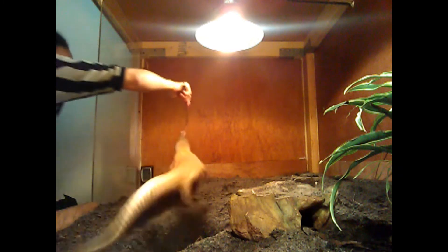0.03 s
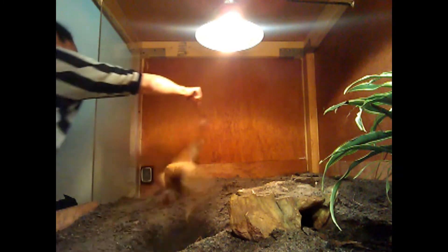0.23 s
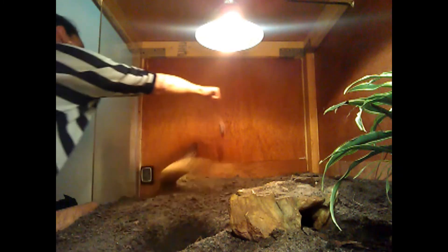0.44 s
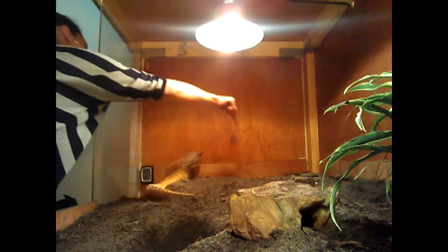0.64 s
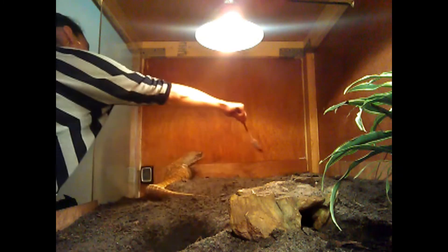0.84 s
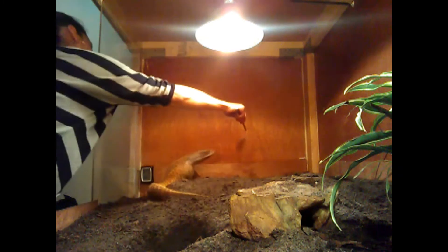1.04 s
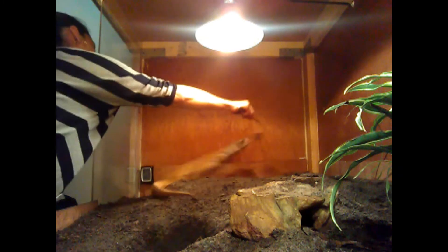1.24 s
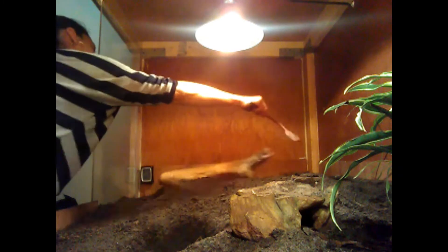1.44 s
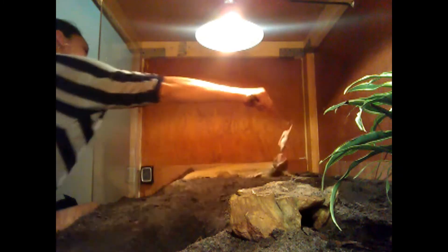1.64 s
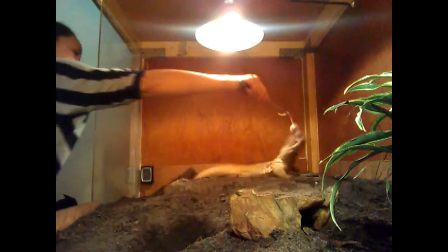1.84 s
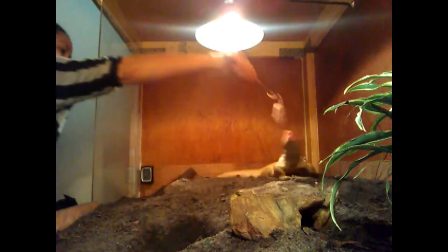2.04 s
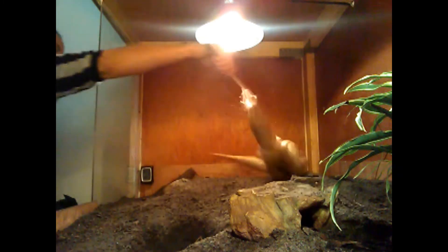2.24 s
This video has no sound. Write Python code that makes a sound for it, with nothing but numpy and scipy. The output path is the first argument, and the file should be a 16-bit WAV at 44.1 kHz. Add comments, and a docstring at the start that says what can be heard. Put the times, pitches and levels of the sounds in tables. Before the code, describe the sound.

Gritty scuffling of a lizard lunging through dirt in a wooden box, with a thump.

```python
"""Lizard lunging in a wooden box

A large lizard lunges for food over loose soil in a wooden enclosure, then shuffles and thumps down again.
Claws spray grit, the belly drags with a duller scrape, and the body knocks on the boards.
The box rings with every move; behind it lies a quiet room."""
import sys
import numpy as np
from scipy import signal
from scipy.fft import rfft, irfft, next_fast_len
from scipy.io import wavfile
from scipy.ndimage import uniform_filter1d

SR = 44100
rng = np.random.default_rng(int(sys.argv[2]) if len(sys.argv) > 2 else 0)


def file_out(sig):
    """Save sig as 16-bit WAV at sys.argv[1]."""
    # one column per channel
    cols = np.atleast_2d(sig).T
    # limit, then scale
    lim = np.clip(cols, -1, 1)
    pcm = np.round(lim * 32767).astype(np.int16)
    wavfile.write(sys.argv[1], SR, pcm)


N = 101429
T = np.arange(N) / SR

# crunch of coarse grit (frequency [Hz], relative level [dB])
COARSE_EQ = [(100, -72.5), (250, -24), (700, -13.5), (1500, -13), (2600, 0.5), (3300, -2), (4100, 4.5),
             (5000, -1.5), (6500, -2.5), (9000, -12.5)]
# sizzle of fine grit (frequency [Hz], relative level [dB])
FINE_EQ = [(100, -67), (500, -39.5), (2500, -25.5), (4500, -9.5), (6300, 8), (7500, 2.5), (8700, 11),
           (9500, -7.5)]
# dull scrape of the belly (frequency [Hz], relative level [dB])
DRAG_EQ = [(60, -68), (140, -37.5), (240, -15.5), (340, -28), (450, -12), (620, -8.5), (780, 3),
           (1200, -4.5), (1800, 2), (2400, -6.5), (4000, -8), (9000, -45)]


def amp(db):
    """Decibels to gain."""
    return 10 ** (np.asarray(db) / 20)


def unit(x):
    """Scales to an rms of one."""
    return x / np.sqrt(np.mean(x ** 2) + 1e-20)


def read(points, hz):
    """Reads a curve along a logarithmic frequency axis."""
    f, value = np.transpose(points)
    return np.interp(np.log(hz + 1), np.log(f), value)


def envelope(points):
    """Gain over time from a level curve, silent outside it."""
    s, db = np.transpose(points)
    return amp(np.interp(T, s, db, left=-np.inf, right=-np.inf))


def add(mix, s, sound):
    """Mixes a sound in at a time, dropping what falls outside."""
    start = round(s * SR)
    sound = sound[:, max(-start, 0):]
    part = mix[:, max(start, 0):][:, :sound.shape[1]]
    part += sound[:, :part.shape[1]]


def colour(x, points, modes=(), size=8192):
    """Minimum-phase EQ of unit energy, from a curve plus resonant peaks and dips."""
    hz = abs(np.fft.fftfreq(size, 1 / SR))
    modes_db = sum(boost / (1 + (2 * (hz - f) / width) ** 2) for f, width, boost in modes)
    log_gain = np.log(amp(read(points, hz) + modes_db))
    spectrum = np.exp(np.conj(signal.hilbert(log_gain)))
    response = np.fft.ifft(spectrum).real[None, :size // 2]
    return signal.fftconvolve(x, response / np.linalg.norm(response), axes=1)[:, :x.shape[1]]


def blend(pair):
    """Makes two unrelated sides alike in the bass and leaves them wide in the treble."""
    # likeness of left and right (frequency [Hz], coherence [0 to 1])
    likeness = [(100, 1), (280, .9), (500, 0.8), (800, 0.75), (1200, 0.4), (2300, 0.25), (9000, 0.27)]
    size = next_fast_len(pair.shape[1] + 2048)
    coherence = np.clip(read(likeness, np.fft.rfftfreq(size, 1 / SR)), 0, 1)
    angle = np.arcsin(coherence) / 2
    spectra = rfft(pair, size)
    return irfft(spectra * np.cos(angle) + spectra[::-1] * np.sin(angle), size)[:, :pair.shape[1]]


def grains(size, per_s=9000, spread_db=1.5, clump_db=1.6, clump_s=.004):
    """Dense, clumped clicks of colliding crumbs; each side gets its own, in shared clumps."""
    strength = amp(spread_db * np.minimum(rng.exponential(1, (2, size)), 4))
    clumps = amp(clump_db * unit(uniform_filter1d(rng.standard_normal(size), int(clump_s * SR))))
    polarity = rng.choice([-1, 1], (2, size))
    hits = rng.random((2, size)) < per_s / SR
    return unit(strength * clumps * polarity * hits)


def burst(decay_s, rise_s, size=8192):
    """A puff of noise with a linear attack and an exponential release."""
    age = np.arange(size) / SR
    attack = np.minimum(age / rise_s, 1)
    release = np.exp(-np.maximum(age - rise_s, 0) / decay_s)
    return rng.choice([-1, 1], (2, size)) * attack * release


def room_tone(level_db=-69):
    """Faint, steady air of the room."""
    # tone of the air (frequency [Hz], relative level [dB])
    air_eq = [(25, 10), (70, -4.5), (140, -22.5), (220, -1), (700, 4), (2000, 3), (4000, 1), (5200, -3.5),
              (7500, -10), (9000, -7)]
    return amp(level_db) * blend(colour(rng.standard_normal((2, N)), air_eq))


def creep():
    """A quiet bed of soil that keeps shifting under the animal."""
    # swell of the shifting soil (time [s], level [dB])
    swell = [(0, -57.5), (0.13, -53), (0.7, -57.5), (0.82, -67), (1.02, -80.5), (1.12, -56.5), (1.33, -66),
             (1.55, -48.5), (1.75, -49.5), (2.03, -52), (2.3, -58.5)]
    # its broad rustle (frequency [Hz], relative level [dB])
    rustle_eq = [(60, -27), (140, -19), (240, -11), (450, -4), (800, -1), (1250, -4), (1800, -1.5),
                 (3000, -2.5), (4100, -4.5), (5500, -6.5), (9000, -4)]
    gain = amp(np.interp(T, *np.transpose(swell)))
    return colour(grains(N) * gain, rustle_eq)


def claw_ticks(half_width_octaves=.45):
    """Brief, bright clicks of a claw catching on something hard."""
    # claw catches (time [s], level [dB], band centre [Hz], decay [s])
    catches = [(0.2135, -19.5, 8940, 0.00071), (0.776, -59.5, 5940, 0.0068), (1.9472, -37.5, 8100, 0.0032),
               (1.952, -33, 6500, 0.0022)]
    ticks = np.zeros((2, N))
    hz = np.geomspace(100, 12000, 60)
    for s, db, centre_hz, decay_s in catches:
        band_db = -10 * np.log10(1 + (np.log2(hz / centre_hz) / half_width_octaves) ** 4)
        click = amp(db) * burst(decay_s, rise_s=decay_s / 10)
        add(ticks, s, colour(click, np.column_stack([hz, band_db]), size=1024))
    return ticks


def thumps():
    """The body rattles the boards, and soft, heavy footfalls boom in the floor of the box."""
    # body against the boards (time [s], level [dB], decay [s])
    knocks = [(0.027, -39, 0.011), (0.037, -36, 0.013), (0.782, -53.5, 0.0014), (1.582, -28, 0.0074),
              (1.586, -26, .005), (1.59, -27, 0.0076)]
    # woody knock of the boards (frequency [Hz], relative level [dB])
    boards_eq = [(60, -76), (140, -43.5), (240, -16), (450, -8.5), (800, 5), (1250, -1.5), (1800, 8),
                 (2500, -7.5), (4000, -18), (9000, -30.5)]
    # feet landing (time [s], level [dB])
    footfalls = [(0.028, -54.5), (0.28, -51), (0.35, -51), (0.441, -45.5), (0.529, -56.5), (0.596, -50.5),
                 (1.19, -70), (1.46, -62.5), (1.582, -45.5)]
    # boom of the floor (frequency [Hz], relative level [dB])
    floor_eq = [(100, -37.5), (220, -9.5), (283, 0), (340, -15.5), (440, 2), (560, 0), (900, -14),
                (3000, -55)]
    blows, steps = np.zeros((2, 2, N))
    for s, db, decay_s in knocks:
        add(blows, s, amp(db) * burst(decay_s, rise_s=.0011))
    for s, db in footfalls:
        add(steps, s, amp(db) * burst(decay_s=.012, rise_s=.016))
    return colour(blows, boards_eq) + colour(steps, floor_eq)


def scuffs(rasp_q=3, rasp_db=8, size=8192):
    """Each foot stroke stirs coarse grit and a dull drag, tinted by its own rasp, plus fine grit."""
    # foot strokes in the soil (peak time [s], rise [s], fall [s], grit level [dB], drag level [dB],
    # fine over coarse grit [dB], rasp centre [Hz])
    strokes = [ (0.036, .007, 0.025, -51.5, -56, -4, 4020), (0.085, 0.0077, 0.013, -48.5, -50, -9.5, 2030),
               (0.143, 0.022, 0.0065, -66, -57, -2, 900), (0.176, 0.0096, 0.0078, -45.5, -46, -17, 3650),
               (0.213, .014, 0.019, -43, -45.5, 6, 860), (0.275, 0.023, 0.07, -44, -39.5, -12, 1600),
               (0.346, .009, .008, -23, -39.5, -2, 5200), (0.392, 0.0051, 0.0087, -39, -34.5, -6, 850),
               (0.412, .016, 0.014, -34, -31.5, -2, 1520), (0.426, 0.0048, 0.023, -23, -31.5, 10, 7000),
               (0.453, 0.0018, 0.0078, -19.5, -30.5, 0.5, 780),
               (0.466, 0.0026, 0.0084, -22, -33, -0.5, 3900),
               (0.508, 0.0046, 0.0059, -24.5, -34.5, -2, 776), (0.608, 0.0093, 0.006, -50, -41.5, 14, 834),
               (0.688, .006, .012, -67, -62.5, 2, 480), (0.963, .008, 0.022, -65.5, -77.5, -15, 3900),
               (1.097, 0.029, 0.031, -64.5, -66, -2.5, 3500), (1.162, 0.0085, .025, -45, -70, -1.5, 5040),
               (1.196, 0.012, .020, -47.5, -55, -2.5, 2500), (1.250, 0.013, 0.037, -53, -61, 1, 2550),
               (1.285, .016, 0.019, -53, -58.5, 0, 4260), (1.383, 0.023, 0.028, -52, -66, 0, 4340),
               (1.409, .010, 0.014, -53.5, -58.5, 0, 770), (1.476, .014, 0.021, -41.5, -55.5, -2.5, 3300),
               (1.516, 0.014, 0.008, -48.5, -55.5, 15, 810), (1.573, .013, 0.025, -43, -43, 4.5, 3700),
               (1.605, 0.021, 0.028, -36, -38.5, -9.5, 2490), (1.648, 0.012, 0.026, -43, -46.5, -3.5, 3730),
               (1.736, 0.015, 0.023, -43.5, -48, 1.5, 785), (1.781, 0.0084, 0.019, -42.5, -50, 4.5, 1780),
               (1.805, 0.0053, 0.0085, -38, -48, -1.5, 3700), (1.868, .014, 0.02, -56, -71, -2, 2600),
               (1.912, 0.011, 0.014, -51, -50, -24, 2720), (1.967, 0.012, 0.0073, -46, -51, -2, 3850),
               (2.004, 0.014, 0.026, -53.5, -53, 2.5, 4000), (2.051, 0.016, 0.018, -72, -54, 9, 1740),
               (2.096, 0.011, .012, -51.5, -55, 1, 2700), (2.120, 0.011, 0.015, -50.5, -55, -12, 4070),
               (2.210, 0.016, 0.013, -59, -55.5, 1, 1620), (2.290, 0.022, .018, -63.5, -63, -19, 1900)]
    coarse, fine, drag = np.zeros((3, 2, N))
    t = (np.arange(size) - size // 2) / SR
    for peak, rise, fall, grit_db, drag_db, fine_db, rasp_hz in strokes:
        start = peak + t[0]
        stroke = np.exp(-(t / np.where(t < 0, rise, fall)) ** 2 / 2)  # lopsided bell
        grit = stroke * amp(grit_db) / np.hypot(1, amp(fine_db))  # coarse and fine share the power
        rasp = [(rasp_hz, rasp_hz / rasp_q, rasp_db)]
        add(coarse, start, colour(grains(size) * grit, COARSE_EQ, rasp, size=1024))
        add(drag, start, colour(grains(size) * stroke * amp(drag_db), DRAG_EQ, rasp, size=2048))
        add(fine, start, grains(size) * grit * amp(fine_db))
    return coarse + drag + colour(fine, FINE_EQ)


def lunge():
    """The long scramble: coarse and fine grit spray while the body drags."""
    # swell of spraying soil (time [s], level [dB])
    spray_swell = [(0.14, -65), (0.175, -47.5), (0.27, -38), (0.315, -32.5), (0.385, -30), (0.45, -29.5),
                   (0.50, -29.5), (0.555, -29.5), (0.605, -42), (0.64, -51.5), (0.76, -79)]
    # swell of the body dragging over the ground (time [s], level [dB])
    drag_swell = [(0.11, -79), (0.18, -54.5), (0.26, -40), (0.36, -35), (0.40, -32), (0.455, -35.5),
                  (0.49, -35), (0.55, -34.5), (0.61, -46), (0.635, -64.5), (0.76, -90)]
    spray = envelope(spray_swell) * np.sqrt(.5)  # half the power to each size of grit
    coarse = colour(grains(N) * spray, COARSE_EQ)
    fine = colour(grains(N) * spray, FINE_EQ)
    drag = colour(grains(N) * envelope(drag_swell), DRAG_EQ)
    return coarse + fine + drag


def enclosure(x, wet_db, size=256):
    """The wooden box adds its standing waves and a short, dense reverb."""
    # standing waves of the box (frequency [Hz], width [Hz], boost [dB])
    box_modes = [(283.3, 35, 9), (415, 100, 5.5), (500, 22, 2.5), (763.7, 40, 6.5), (846.4, 17, 5.5),
                 (941, 28, 4), (1096, 30, 5.5), (1294, 26, 2.5), (1610, 22, -6.5), (1602, 33, 5),
                 (1770, 10, -5.5), (1918, 35, 5.5)]
    # reverb of the box (frequency [Hz], time to fall 60 dB [s])
    box_decay = [(150, 0.19), (300, .24), (800, 0.26), (2000, 0.16), (4000, 0.21), (9000, 0.09)]
    noise = blend(rng.standard_normal((2, SR // 2)))
    hz, t, bands = signal.stft(noise, SR, nperseg=size)
    fade = amp(-60 * t / read(box_decay, hz)[:, None])
    tail = signal.istft(bands * fade, SR, nperseg=size)[1]
    response = amp(wet_db) * tail / np.linalg.norm(tail, axis=1, keepdims=True)
    response[:, 0] += 1  # direct sound
    flat_eq = [(20, 0), (20000, 0)]
    ringing = colour(x, flat_eq, box_modes)
    return signal.fftconvolve(ringing, response / np.hypot(1, amp(wet_db)), axes=1)[:, :N]


def scene():
    """The lizard moves in its box, over the room tone."""
    lizard = blend(lunge() + scuffs() + creep() + thumps() + claw_ticks())
    return enclosure(lizard, wet_db=-7.5) + room_tone()


def record(dry, low_cut_hz=204, high_cut_hz=9050, bass_leak_db=-26):
    """The left microphone hears more; the bass is thinned and the top of the treble cut."""
    # stereo balance (frequency [Hz], left over right [dB])
    balance = [(60, 20), (200, 6), (600, 3.5), (1200, 5.5), (2400, 6), (4500, 6.5), (8500, 1.5)]
    # phase between the sides (frequency [Hz], lead of the left [rad])
    left_lead = [(300, 0), (700, -0.55), (950, -1.1), (1600, -0.7), (2300, 0.66)]
    hz = np.fft.rfftfreq(2 * N, 1 / SR)
    lean_db = read(balance, hz) / 2
    turn = np.exp(.5j * read(left_lead, hz))
    pan = amp([lean_db, -lean_db]) * np.array([turn, 1 / turn])
    panned = irfft(rfft(dry, 2 * N) * pan)[:, :N]
    high_pass = signal.butter(6, low_cut_hz, "high", fs=SR, output="sos")
    thinned = signal.sosfilt(high_pass, panned) + amp(bass_leak_db) * panned
    low_pass = signal.firwin(701, high_cut_hz, window=("kaiser", 9), fs=SR)
    return signal.oaconvolve(thinned, low_pass[None], "same")


dry = scene()
out = record(dry)
file_out(out)
```